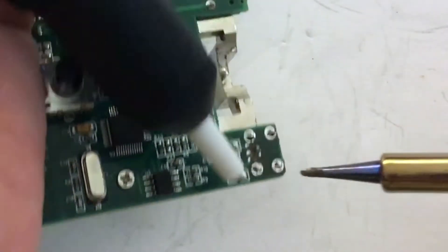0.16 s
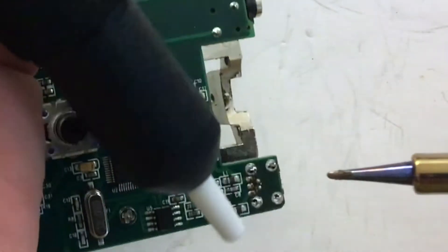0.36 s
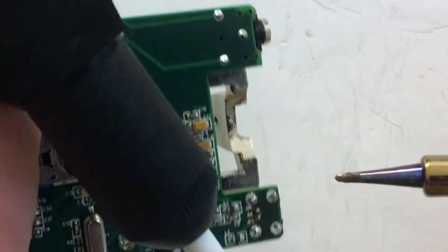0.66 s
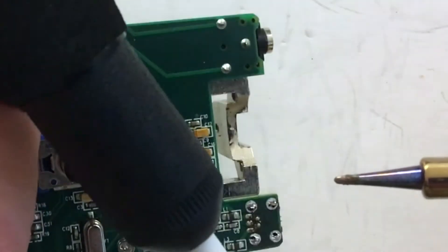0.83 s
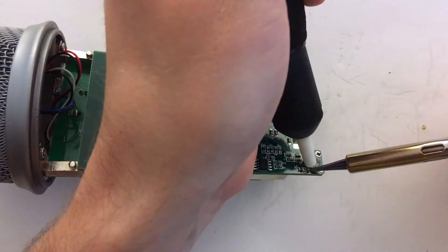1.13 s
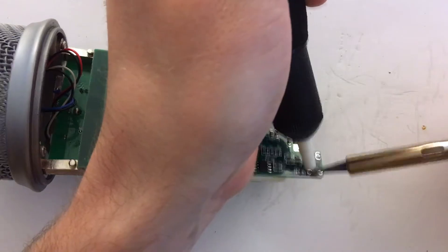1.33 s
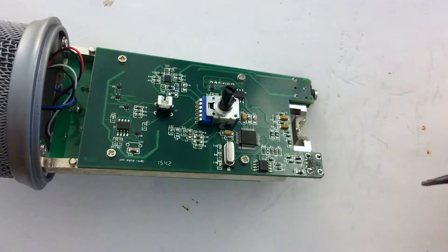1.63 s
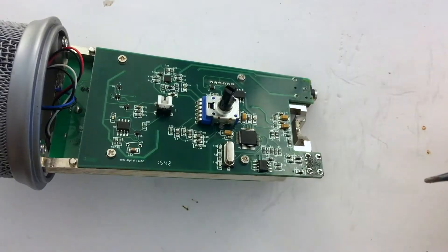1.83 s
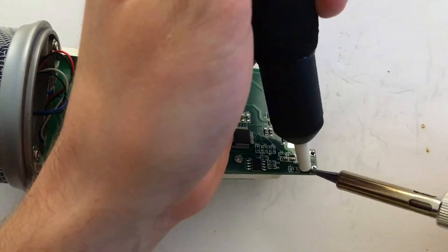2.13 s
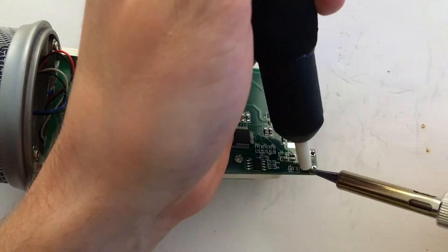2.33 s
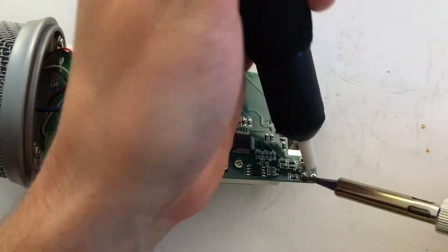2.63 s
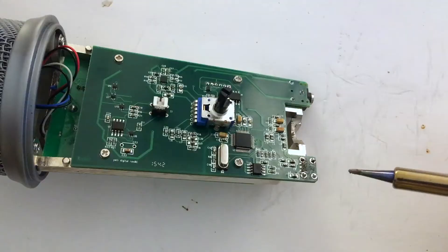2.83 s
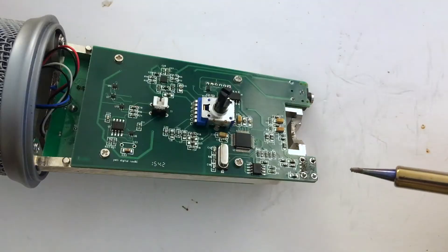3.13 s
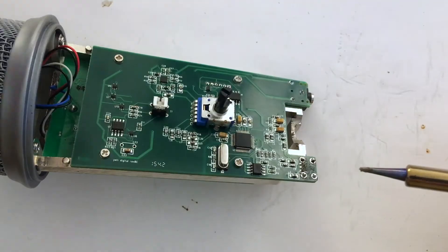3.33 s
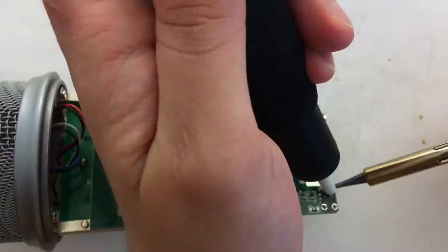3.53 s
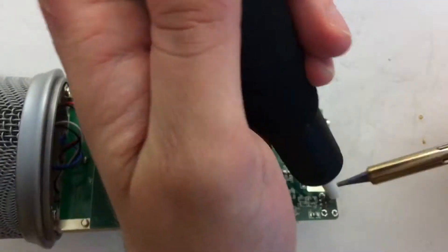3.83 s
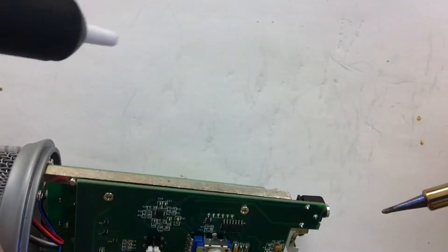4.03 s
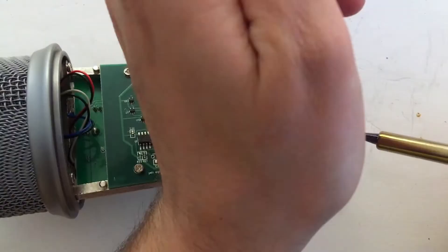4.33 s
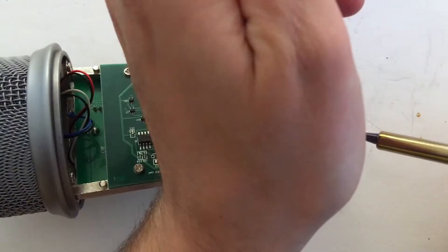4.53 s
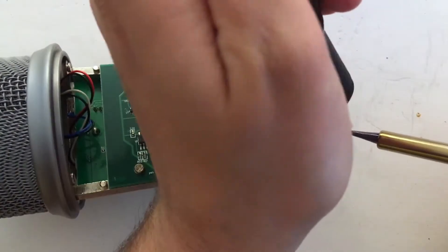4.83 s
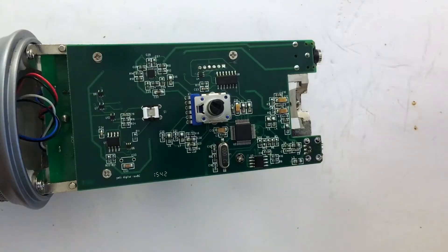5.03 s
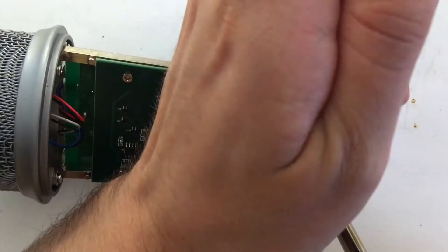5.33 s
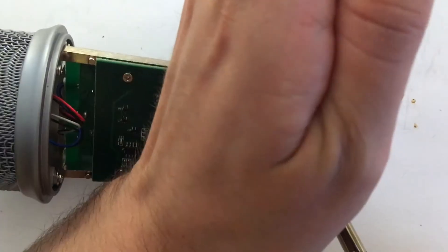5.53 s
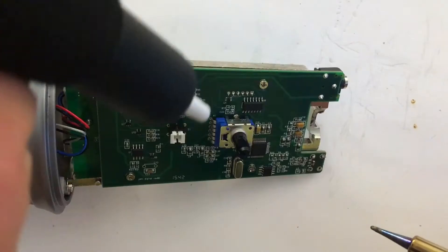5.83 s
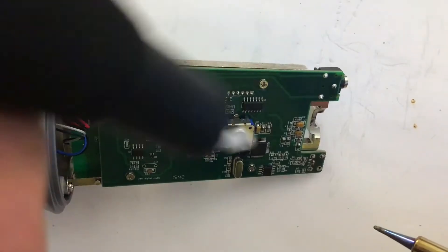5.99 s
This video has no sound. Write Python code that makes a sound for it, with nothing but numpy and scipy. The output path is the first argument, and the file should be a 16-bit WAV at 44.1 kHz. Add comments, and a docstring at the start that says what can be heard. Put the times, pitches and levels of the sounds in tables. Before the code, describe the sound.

Close workbench sounds: a solder sucker cracks and thumps, is re-cocked with bright metallic clicks, and tools knock and rattle between shots.

```python
"""Desoldering pump on a workbench

A small room: a spring-loaded pump is fired five times on a circuit board and cocked again after each shot.
A shot is filtered noise for the rush of spring and plunger, a hard crack for the slam and a ringing bench thump.
Cocking is a ringing latch click, then the rod slides home. Things are nudged on the bench, modes ringing at each
knock. Behind it lie a faint squeak, soft swishes, hiss, rumble and a mains hum that grows near the end."""
import sys
import numpy as np
from scipy import signal
from scipy.fft import rfft, irfft, next_fast_len
from scipy.io import wavfile

SR = 44100
rng = np.random.default_rng(int(sys.argv[2]) if len(sys.argv) > 2 else 0)


def master(y):
    """Save y as 16-bit WAV."""
    cut = np.clip(np.atleast_2d(y).T, -1, 1)
    pcm = np.round(cut * 32767)  # scale
    wavfile.write(sys.argv[1], SR, pcm.astype(np.int16))


N = 271656
TIME = np.arange(N) / SR
FREQS = np.fft.rfftfreq(4096, 1 / SR)  # Hz, the grid on which filters are drawn
RING = SR // 2  # samples kept of each blow


def amp(db):
    """Decibels to gain."""
    return 10 ** (np.asarray(db) / 20)


def unit(x):
    """Scales a sound to energy 1."""
    return x / np.sqrt(np.sum(x ** 2) + 1e-20)


def read(points, hz):
    """Reads a spectrum table on a log-frequency axis."""
    f, value = np.transpose(points)
    return np.interp(np.log(hz + 1), np.log(f + 1), value)


def level(curve):
    """A table of time_s, level_db as a gain for every sample."""
    return amp(np.interp(TIME, *np.transpose(curve)))


def add(mix, start_s, sound):
    """Mixes a sound in at a time."""
    part = mix[max(round(start_s * SR), 0):][:len(sound)]
    part += sound[:len(part)]


def tint(x, db, tilt_db=0):
    """Passes x through a minimum-phase filter with gain db on FREQS, tilted per octave about 4 kHz; energy 1."""
    db = db + tilt_db * np.log2(np.maximum(FREQS, 500) / 4000)
    log_gain = np.log(amp(np.r_[db, db[-2:0:-1]]))
    response = np.exp(np.conj(signal.hilbert(log_gain)))
    taps = np.fft.ifft(response).real[:len(FREQS)]
    return unit(signal.fftconvolve(x, taps))


def noise(colour):
    """Steady noise of rms 1 with a given spectrum."""
    size = next_fast_len(N)
    gain = amp(read(colour, np.fft.rfftfreq(size, 1 / SR)))
    spectrum = rfft(rng.standard_normal(size)) * gain
    return unit(irfft(spectrum, size)[:N]) * np.sqrt(N)


def resonance(hz, width_hz):
    """The gain of one resonance on FREQS."""
    return 1 / (1 + 2 * ((FREQS - hz) / width_hz) ** 2)


def crack(decay_s):
    """One hard contact: a millisecond or two of chatter with a nearly even spectrum."""
    t = np.arange(512) / SR
    shape = t / decay_s * np.exp(-t / decay_s)
    x = rng.standard_normal(len(t))
    # squash and shape the chatter, then flatten its spectrum, in turns
    for _ in range(4):
        spectrum = rfft(np.tanh(x / x.std()) * shape)
        x = irfft(spectrum / (abs(spectrum) + 1e-12))
    return unit(x * shape ** .5)


def scrape(length_s, grain_db, swell_db=0):
    """Rattling contact: lumpy noise that may swell or sink by swell_db and stops with the stroke."""
    t = np.arange(2048) / SR
    lumps = np.interp(t, np.linspace(0, t[-1], num=48), rng.standard_normal(size=48))
    gate = np.clip(np.minimum(t, length_s - t) / 0.00027, 0, 1)
    swell = swell_db * np.minimum(t / length_s, 1)
    return unit(rng.standard_normal(len(t)) * amp(grain_db * lumps + swell) * gate)


def ring(modes, spread_db):
    """Dying modes; each blow lands elsewhere, so their levels and pitches are drawn anew."""
    t = np.arange(RING) / SR
    out = np.zeros(RING)
    for hz, db, t60 in modes:
        level_draw, pitch_draw = rng.standard_normal(2)
        decay = amp(db + spread_db * level_draw - 60 * t / t60)
        out += decay * np.sin(2 * np.pi * hz * (1 + 0.0095 * pitch_draw) * t)
    return unit(out)


# reverberation time of the small room: pitch_hz, t60_s
ROOM_DECAY = [(100, 0.39), (260, 0.39), (700, 0.3), (1840, 0.31), (4850, 0.26), (9000, 0.2), (15000, 0.17)]
# colour of its tail: pitch_hz, level_db
ROOM_TINT = [(60, -3.5), (250, -4.5), (600, -2), (1100, -4.5), (2400, 2), (4500, -5), (7000, 0.5),
             (11000, -0.5), (15000, 0)]
ECHO_S = 0.0079  # off the nearest surface


def room(x, wet_db, echo_db=-13, build_s=0.003):
    """One near echo, then a diffuse tail whose treble dies first; drawn anew for each blow, as the hands move."""
    hz, t, z = signal.stft(rng.standard_normal(RING), SR, nperseg=256)
    decay_db = -60 * t / read(ROOM_DECAY, hz)[:, None]
    z = z * amp(read(ROOM_TINT, hz)[:, None] + decay_db)
    tail = signal.istft(z, SR, nperseg=256)[1]
    build = np.minimum(np.arange(len(tail)) / SR / build_s, 1)
    response = amp(wet_db) * unit(tail * build)
    response[0] += 1  # direct sound
    add(response, ECHO_S, amp(echo_db) * np.ones(1))
    return signal.fftconvolve(x, response)


# hiss spectrum: pitch_hz, density_db (dB per Hz)
HISS_COLOUR = [(20, 11.5), (60, -3), (150, -5.5), (300, -2.5), (600, -11.5), (1500, -13), (3000, -19.5),
               (8000, -19.5), (14500, -21.5), (16000, -33.5)]
# rumble before its lift: time_s, level_db
RUMBLE_LEVEL = [(0.0, -75.5), (1.11, -72.5), (4.42, -74.5), (4.54, -69.5), (6.15, -63)]
# rumble spectrum: pitch_hz, density_db (dB per Hz)
RUMBLE_SPECTRUM = [(10, 5.5), (42, 0.5), (60, -11), (85, -13), (160, -25.5), (600, -60.5)]
# mains hum, louder near the end: time_s, level_db (rms)
HUM_LEVEL = [(0, -90.5), (4.865, -89.5), (4.885, -68), (6.16, -71.5)]
HISS_DB, RUMBLE_LIFT_DB, MAINS_HZ = -77, 4, 60
SWAY_DB, SWAY_T60_S = -51.5, .45  # the bench sways after each shot


def background():
    """Faint hiss, mains hum, and a low rumble that jumps after each shot and dies away."""
    hiss = amp(HISS_DB) * noise(HISS_COLOUR)
    sway = np.zeros(N)
    for slam_s, *_ in SHOT_LIST:
        sway += (TIME > slam_s) * amp(SWAY_DB - 60 * abs(TIME - slam_s) / SWAY_T60_S)
    rumble = (amp(RUMBLE_LIFT_DB) * level(RUMBLE_LEVEL) + sway) * noise(RUMBLE_SPECTRUM)
    hum = level(HUM_LEVEL) * np.sqrt(2) * np.sin(2 * np.pi * MAINS_HZ * TIME)
    return hiss + rumble + hum


# two close lines of a thin squeak: pitch_hz, level_db (rms)
SQUEAK_LINES = [(1330, -83), (1570, -80.5)]
SQUEAK_S, SQUEAK_LENGTH_S = .8, .25
WARBLE_HZ, WARBLE_SHARE, SQUEAK_WIDTH_HZ = 4.7, 0.021, 25  # share of the pitch; width of each line


def squeak():
    """Two thin lines with randomly drifting phase that warble together."""
    out = np.zeros(N)
    t = np.arange(round(SQUEAK_LENGTH_S * SR)) / SR
    bend = 1 + WARBLE_SHARE * np.cos(2 * np.pi * WARBLE_HZ * t)
    gate = signal.windows.tukey(len(t), .15)
    for hz, db in SQUEAK_LINES:
        drift = np.cumsum(rng.standard_normal(len(t))) * np.sqrt(2 * np.pi * SQUEAK_WIDTH_HZ / SR)
        tone = np.sin(2 * np.pi * np.cumsum(hz * bend) / SR + drift)
        add(out, SQUEAK_S, amp(db) * np.sqrt(2) * gate * tone)
    return out


# faint two-toned swishes between the strokes: start_s, length_s, lower_band_hz, level_db
SWISH_LIST = [(1.546, 0.11, 1300, -74), (2.164, 0.091, 1260, -73), (2.216, 0.1, 1510, -81),
              (2.398, .06, 1287, -68), (2.681, 0.17, 1407, -70), (3.421, 0.3, 1550, -79.5)]
SWISH_WIDTH_HZ, OVERTONE_RATIO, OVERTONE_DB = 330, 1.86, -7.5


def swishes():
    """Short stretches of soft noise in a narrow band and its overtone."""
    out = np.zeros(N)
    for start_s, length_s, hz, db in SWISH_LIST:
        gate = signal.windows.tukey(round(length_s * SR), .4)
        lower = resonance(hz, SWISH_WIDTH_HZ) ** 2
        upper = resonance(hz * OVERTONE_RATIO, SWISH_WIDTH_HZ * OVERTONE_RATIO) ** 2
        bands_db = 20 * np.log10(lower + amp(OVERTONE_DB) * upper + 1e-5)
        swish = tint(rng.standard_normal(len(gate)) * gate, bands_db)
        add(out, start_s, amp(db) * np.sqrt(len(gate)) * swish)
    return out


# plunger pushed before each latch click and held after it: push_s, hold_s, rub_db
PUSH_LIST = [(0.22, 0.215, -70.5), (0.13, 0.483, -71), (0.15, .31, -71.5), (0.23, 0.268, -76),
             (0.2, 0.24, -69)]
# the board shifted under the hand at the start: middle_s, length_s, level_db
SHIFT_LIST = [(0.173, 0.48, -75), (0.492, 0.34, -73.5)]
# rubbing spectrum: pitch_hz, density_db (dB per Hz)
RUB_SPECTRUM = [(60, -13.5), (280, 5.5), (600, 0), (1400, -3), (2400, -10.5), (3700, -4.5), (6500, -7.5),
                (9000, -11.5), (16000, -16)]
PUSH_RISE_S, LET_GO_S, HOLD_DB = 0.055, 0.027, -0.5
SEAL_HZ, SEAL_WIDTH_HZ, SEAL_DB = 3650, 450, -6.5  # the piston's seal sings in the barrel


def rubbing():
    """The piston rubs along the barrel on every cocking stroke; at first the board rustles under the hand."""
    piston, push, hand = np.zeros(N), np.zeros(N), np.zeros(N)
    for (click_s, *_), (push_s, hold_s, db) in zip(LATCH_LIST, PUSH_LIST):
        t = TIME - click_s
        gate = np.minimum((t + push_s) / PUSH_RISE_S, (hold_s - t) / LET_GO_S)
        stroke = amp(db) * np.clip(gate, 0, 1)
        piston += stroke * np.where(t < 0, 1, amp(HOLD_DB))
        push += stroke * (t < 0)
    for middle_s, length_s, db in SHIFT_LIST:
        hand += amp(db) * np.cos(np.pi * np.clip((TIME - middle_s) / length_s, -.5, .5))
    seal_db = 20 * np.log10(resonance(SEAL_HZ, SEAL_WIDTH_HZ) + 1e-5)
    seal = tint(rng.standard_normal(N), seal_db)[:N] * np.sqrt(N)
    return (piston + hand) * noise(RUB_SPECTRUM) + amp(SEAL_DB) * push * seal


# the housing judders briefly as it is dragged on the bench
JUDDER_S, JUDDER_LENGTH_S, JUDDER_DB, OCTAVE_DB = 5.906, 0.063, -52.5, -0.5
JUDDER_HZ, JUDDER_RISE_HZ_PER_S = 163.5, 620


def judder():
    """Quick sticking and slipping: a low tone and its octave that swell, rise a little and fade."""
    out = np.zeros(N)
    t = np.arange(round(JUDDER_LENGTH_S * SR)) / SR
    angle = 2 * np.pi * np.cumsum(JUDDER_HZ + JUDDER_RISE_HZ_PER_S * t) / SR
    swell = np.sin(np.pi * (t / JUDDER_LENGTH_S) ** 0.57)
    tones = np.sin(angle) + amp(OCTAVE_DB) * np.sin(2 * angle)
    add(out, JUDDER_S, room(amp(JUDDER_DB) * swell * tones, wet_db=-5))
    return out


# tools and board knock on the bench, one edge and then the other:
# start_s, first_db, gap_s, second_db, thump_db, brightness_db_per_octave
KNOCK_LIST = [(2.7602, -33.5, 0.014, -52, -61, -1), (2.981, -25, 0.01, -25.5, -48, 0.5),
              (3.0176, -20, .0087, -18.5, -41, 0), (3.0741, -19.5, .0128, -21, -46, 1),
              (3.1576, -29, .008, -37, -39, 0.5), (3.2129, -24, 0.014, -37.5, -34, -1),
              (4.9983, -39, 0.0095, -61, -48, 0.5)]
# dull bumps of the housing on the bench: start_s, level_db
BUMP_LIST = [(3.0581, -28), (3.186, -28.5), (3.2147, -22), (3.2422, -26.5), (3.29, -34.5)]
# spectrum of a knock: pitch_hz, density_db (dB per Hz)
KNOCK_COLOUR = [(60, -9), (200, 1.5), (380, 6), (560, -1), (800, 0.5), (1300, 2), (2400, -4.5),
                (4000, -4.5), (7000, -11.5), (11000, -15.5), (16000, -22.5)]
# the circuit board: pitch_hz, level_db, t60_s
BOARD = [(660, -12, 0.15), (805, -5, 0.058), (940, -2.5, 0.13), (1070, -1, .1), (1185, -2.5, .08),
         (1402, -5, 0.19), (1554, -4, 0.06), (2900, -4.5, 0.055)]
# the housing that holds the board, rocking on the bench: pitch_hz, level_db, t60_s
HOUSING = [(78.6, -9, 0.2), (109, -9, 0.18), (145.2, -2.5, 0.35), (212, -2.5, .22), (285, -4.5, 0.13),
           (383.6, -9, 0.088)]


def handling():
    """Tools and board land on one edge, then the other, and chatter on briefly; the housing rocks."""
    out, colour = np.zeros(N), read(KNOCK_COLOUR, FREQS)
    for start_s, first_db, gap_s, second_db, thump_db, tilt_db in KNOCK_LIST:
        knock = np.zeros(RING)
        for at, db in ((0, first_db), (gap_s, second_db)):
            chatter = scrape(length_s=.03, grain_db=3.5, swell_db=-7.5)
            add(knock, at, amp(db - 12) * ring(BOARD, spread_db=0.5))
            add(knock, at, amp(db - 1.5) * tint(crack(decay_s=0.00057), colour, tilt_db))
            add(knock, at, amp(db - 3.0) * tint(chatter, colour, tilt_db))
        add(knock, 0, amp(thump_db) * ring(HOUSING, spread_db=2.5))
        add(out, start_s, room(knock, wet_db=-4.0))
    for start_s, db in BUMP_LIST:
        add(out, start_s, room(amp(db) * ring(HOUSING, spread_db=4.0), wet_db=2.0))
    return out


# the bench top: pitch_hz, level_db, t60_s
BENCH = [(79, -5, 0.25), (147.2, -8.5, 0.31), (230, -9, 0.021), (254.8, 3, 0.19), (253, -15.5, 0.41),
         (311.6, -10, 0.22), (392, -14.5, 0.25), (426, -8, 0.11), (653, -19.5, 0.49), (800, -19.5, 0.4)]
# spectrum of a push on the bench: pitch_hz, density_db (dB per Hz)
THUMP_COLOUR = [(25, -30.5), (80, -0.5), (150, 0.5), (260, 10.5), (400, 5), (620, -9), (1500, -35),
                (5000, -75)]


def thump(ring_db):
    """A low push on the bench, after which its top rings."""
    top = amp(ring_db) * ring(BENCH, spread_db=1.5)
    add(top, 0, tint(np.ones(1), read(THUMP_COLOUR, FREQS)))
    return unit(top)


# the pump's barrel and spring: pitch_hz, width_hz, level_db
PUMP = [(3940, 150, -9), (4440, 420, 4), (6280, 220, -14.5), (7450, 520, -10), (8967, 250, -1),
        (10600, 1100, -11), (12100, 520, -11)]


def pump_gain(pitch):
    """The gain of the pump's resonances on FREQS, all moved by one pitch ratio."""
    return np.sqrt(sum((amp(db) * resonance(hz * pitch, width)) ** 2 for hz, width, db in PUMP))


SPRING_T60_S = .42  # ringing freely


def spring(pitch, t60):
    """The spring's many close modes ring on in clusters: dying noise through the pump's resonances."""
    t = np.arange(RING) / SR
    dying = rng.standard_normal(len(t)) * amp(-60 * t / t60)
    return tint(dying, 20 * np.log10(pump_gain(pitch) + 1e-5))


# the rod slides home: start_s, length_s, slide_db, end_stop_db
SLIDE_LIST = [(1.96, 0.012, -12, -20.5), (4.1756, .0123, -10, -19), (5.194, 0.018, -15, -22),
              (6.007, 0.013, -17, -34), (6.0237, 0.0063, -9.5, -16)]
# small ticks of the pump's metal parts: start_s, level_db
TICK_LIST = [(0.551, -45.5), (0.802, -51), (1.7093, -26.5), (2.73, -47), (3.581, -45.5), (3.85, -33.5),
             (4.161, -24), (4.774, -40), (4.915, -41.5), (5.691, -39.5), (5.735, -32.5)]
# spectrum of sliding metal: pitch_hz, density_db (dB per Hz)
SLIDE_COLOUR = [(100, -15.5), (700, -11.5), (2300, -18.5), (3300, -7), (4400, 1.5), (5200, -3.5),
                (8000, -9), (9300, 0), (10500, -13.5), (12600, -15), (16000, -24.5)]


def slides():
    """The rod slides home against its stop; small metal parts tick as the pump is held."""
    out, colour = np.zeros(N), read(SLIDE_COLOUR, FREQS)
    for start_s, length_s, slide_db, stop_db in SLIDE_LIST:
        slide = np.zeros(RING)
        rattle = scrape(length_s, grain_db=2.5, swell_db=3)
        stop = tint(crack(decay_s=0.00032), read(KNOCK_COLOUR, FREQS))
        add(slide, 0, amp(slide_db) * tint(rattle, colour))
        add(slide, length_s, amp(stop_db) * stop)
        add(slide, length_s, amp(stop_db - 13.5) * thump(ring_db=19))
        add(slide, length_s, amp(slide_db - 29.5) * spring(1, SPRING_T60_S))
        add(out, start_s, room(slide, wet_db=-7.5))
    tick_colour = 20 * np.log10(amp(colour) + 1.4 * resonance(4000, 520))
    for start_s, db in TICK_LIST:
        tick = tint(crack(decay_s=0.0007), tick_colour, tilt_db=-0.1)
        add(out, start_s, room(amp(db) * tick, wet_db=-4.5))
    return out


# one row a latch click:
# click_s, click_db, spring_ring_db, pitch_ratio, brightness_db_per_octave, barrel_db
LATCH_LIST = [(1.8503, 2.5, -24.5, 1.017, -1, -18), (2.852, 2.5, -34.5, 1.027, -1.5, -4.5),
              (4.035, 1.5, -17, 1.01, -1, -33.5), (5.0768, -1, -15.5, 0.997, -0.5, -15.5),
              (5.871, 1.5, -36, 0.98, -1, -32)]
# spectrum of the catch: pitch_hz, density_db (dB per Hz)
LATCH_COLOUR = [(100, -37.5), (650, -32), (1200, -17.5), (1900, -15), (2250, -25), (2900, -12), (3800, -6),
                (4900, -15), (5600, -14), (8000, -20), (12200, -14.5), (13300, -23), (16000, -22)]
BARREL_HZ, BARREL_WIDTH_HZ = 2600, 150
LEAD_S = .0012  # from tripping the catch to its snap


def latches():
    """The plunger trips the catch, the catch snaps in, and barrel and spring ring."""
    out = np.zeros(N)
    for click_s, click_db, ring_db, pitch, tilt_db, barrel_db in LATCH_LIST:
        click = np.zeros(RING)
        catch = amp(read(LATCH_COLOUR, FREQS))
        barrel = amp(barrel_db) * resonance(BARREL_HZ, BARREL_WIDTH_HZ)
        colour = 10 * np.log10(catch ** 2 + pump_gain(pitch) ** 2 + barrel ** 2)
        add(click, 0, amp(click_db - 14) * tint(crack(decay_s=.0003), colour, tilt_db))
        add(click, LEAD_S, amp(click_db) * tint(crack(decay_s=.0007), colour, tilt_db))
        # the coils buzz briefly against the barrel, then ring on freely
        add(click, LEAD_S, amp(click_db - 18.5) * spring(pitch, t60=.11))
        add(click, LEAD_S, amp(ring_db) * spring(pitch, SPRING_T60_S))
        add(out, click_s - LEAD_S, room(click, wet_db=-7.0))
    return out


# one row a shot: slam_s, slam_db, rush_db, bench_thump_db, brightness_db_per_octave
SHOT_LIST = [(1.33, -1.5, -7.5, -3.5, 0.5), (2.4567, -2, -6.5, -8, 1), (3.7023, -1.5, -5.5, -3, 1.5),
             (4.5655, -2.5, -9, -6.5, 1.5), (5.4815, 0.5, -7.5, -3.5, 2)]
# spectrum of the slam: pitch_hz, density_db (dB per Hz)
SLAM_COLOUR = [(60, -12.5), (300, -14), (650, 5), (1000, 9.5), (1500, 5), (2100, -14.5), (3000, 3),
               (4000, 3.5), (4900, 8.5), (6200, -2), (7600, 2.5), (9500, -6.5), (13000, -4.5), (16000, -12)]
# spectrum of the rush: pitch_hz, density_db (dB per Hz)
RUSH_COLOUR = [(60, -14), (300, 6.5), (800, 1.5), (1400, 3.5), (2100, 0), (3300, -4), (4400, 3), (5500, 3),
               (6500, -5), (9000, -7.5), (12000, -6.5), (16000, -15)]
TRAVEL_S, REBOUND_S = .0143, .0019


def shots():
    """The trigger lets go, the pump recoils, the plunger flies back and slams into its stop."""
    out = np.zeros(N)
    rush_colour, slam_colour = read(RUSH_COLOUR, FREQS), read(SLAM_COLOUR, FREQS)
    for slam_s, slam_db, rush_db, thump_db, tilt_db in SHOT_LIST:
        shot = np.zeros(RING)
        release = tint(crack(decay_s=0.00062), rush_colour, tilt_db)
        rush = tint(scrape(TRAVEL_S, grain_db=3.0), rush_colour, tilt_db)
        add(shot, .0005, amp(rush_db - 5.5) * release)
        add(shot, .001, amp(rush_db + 0.5) * rush)
        add(shot, .001, amp(thump_db - 6.5) * thump(ring_db=10.5))
        # the recoiling nozzle strikes the board halfway through the stroke
        nozzle = tint(crack(decay_s=.0006), read(KNOCK_COLOUR, FREQS), tilt_db=-12.5)
        add(shot, TRAVEL_S / 2, amp(thump_db - 11.0) * nozzle)
        add(shot, TRAVEL_S / 2, amp(slam_db - 23) * ring(BOARD, spread_db=8.5))
        slam = tint(crack(decay_s=0.0007), slam_colour, tilt_db)
        add(shot, TRAVEL_S, amp(slam_db) * slam)
        add(shot, TRAVEL_S, amp(thump_db) * thump(ring_db=-3.5))
        # the plunger rebounds at once and strikes again
        rebound = tint(crack(decay_s=.0005), slam_colour, tilt_db + 1)
        add(shot, TRAVEL_S + REBOUND_S, amp(slam_db - 8.5) * rebound)
        # the spring shudders against the barrel after the slam
        shudder = tint(scrape(length_s=0.017, grain_db=4.0), rush_colour, tilt_db + 0.29)
        add(shot, TRAVEL_S + .003, amp(slam_db - 7.5) * shudder)
        add(out, slam_s - TRAVEL_S, room(shot, wet_db=-8.5))
    return out


def scene():
    """Pump and bench in the room, over the background."""
    behind = background() + squeak() + swishes()
    bench = rubbing() + judder() + handling()
    pump = slides() + latches() + shots()
    return (behind + bench + pump)[None]


EDGE_HZ = 16100


def record(dry):
    """The recorder's band limit: one channel through a steep low-pass."""
    low_pass = signal.firwin(511, EDGE_HZ, window=("kaiser", 9), fs=SR)
    return signal.oaconvolve(dry, low_pass[None], "same")


dry = scene()
out = record(dry)
master(out)
```